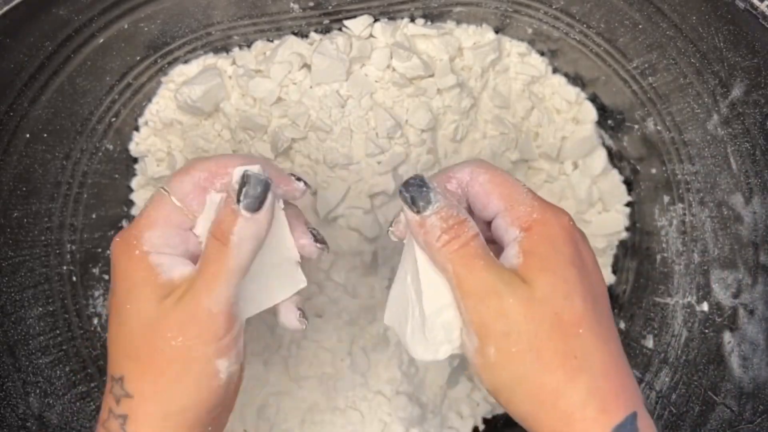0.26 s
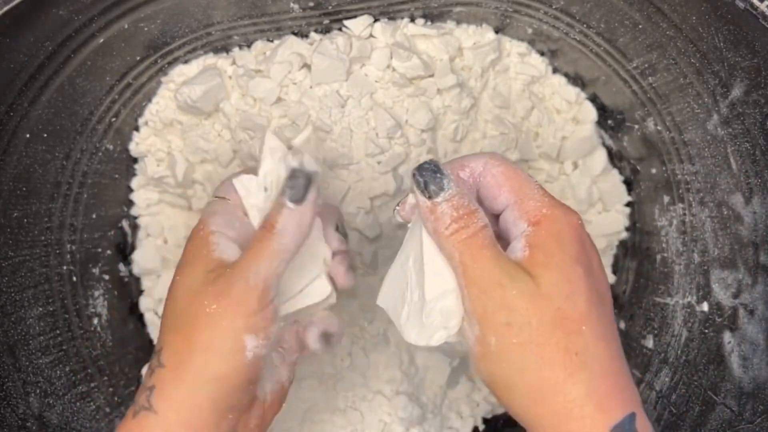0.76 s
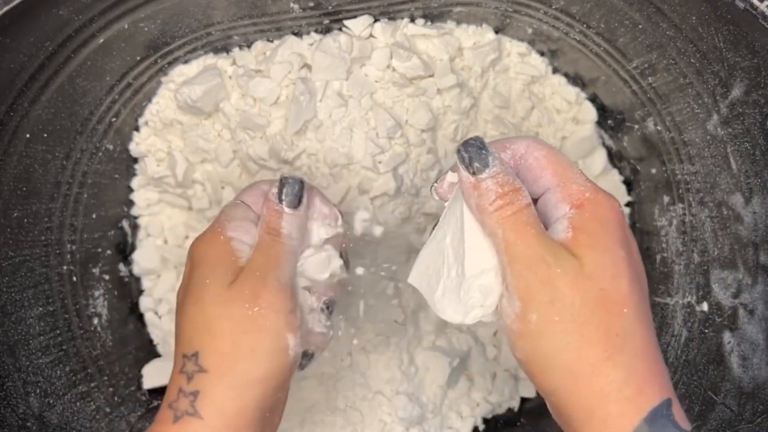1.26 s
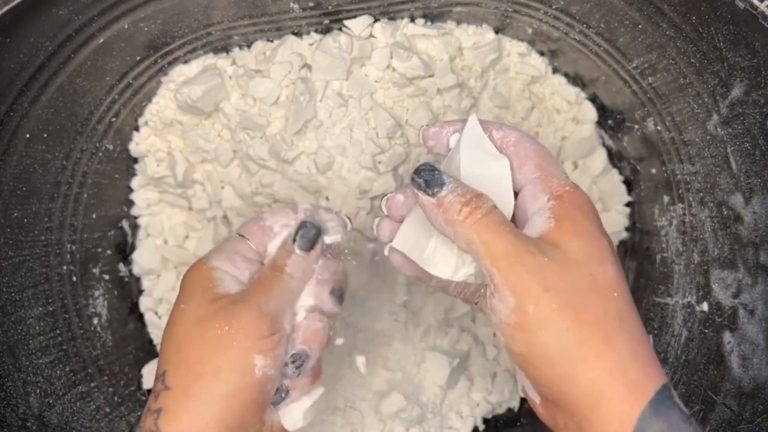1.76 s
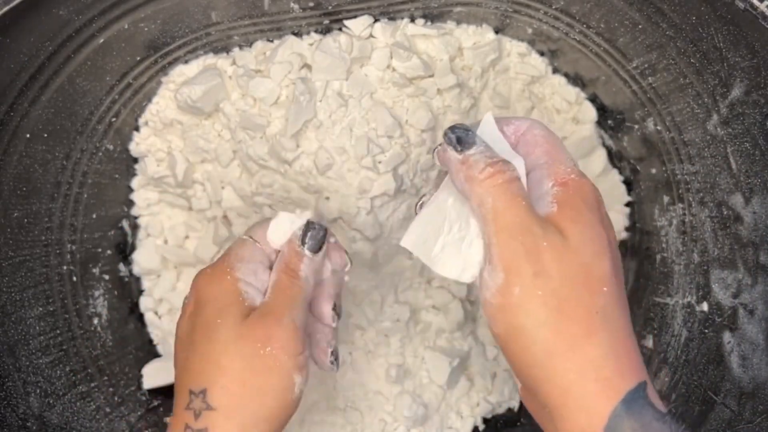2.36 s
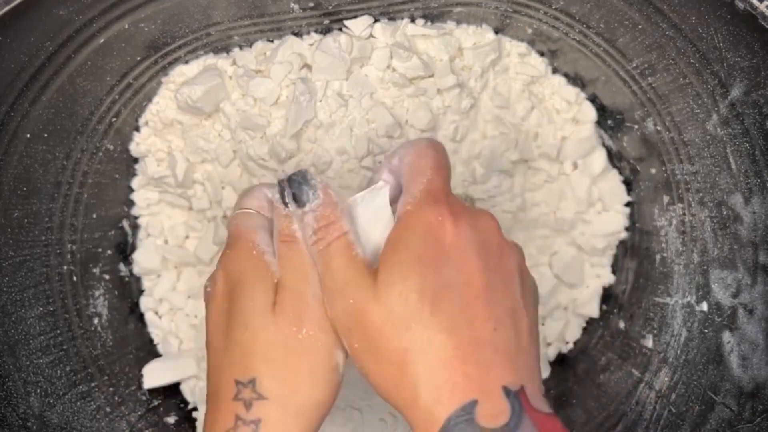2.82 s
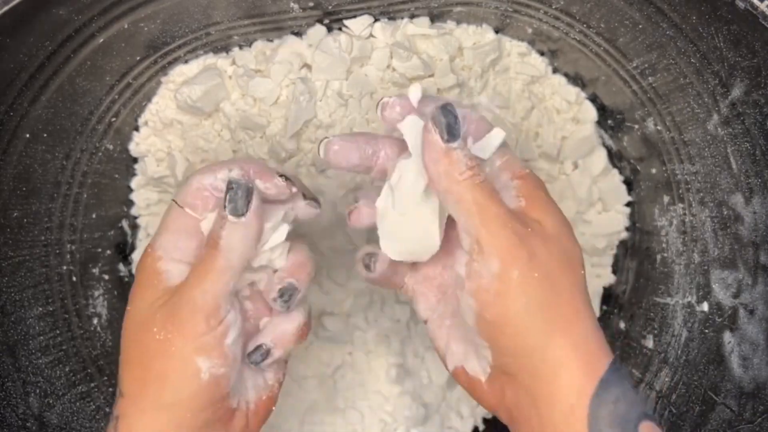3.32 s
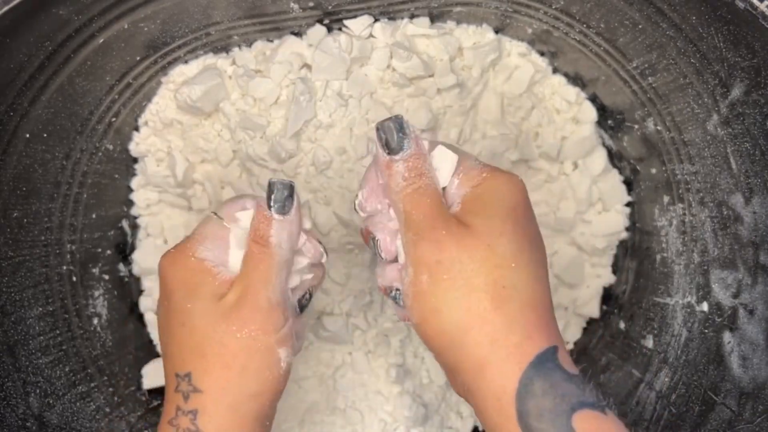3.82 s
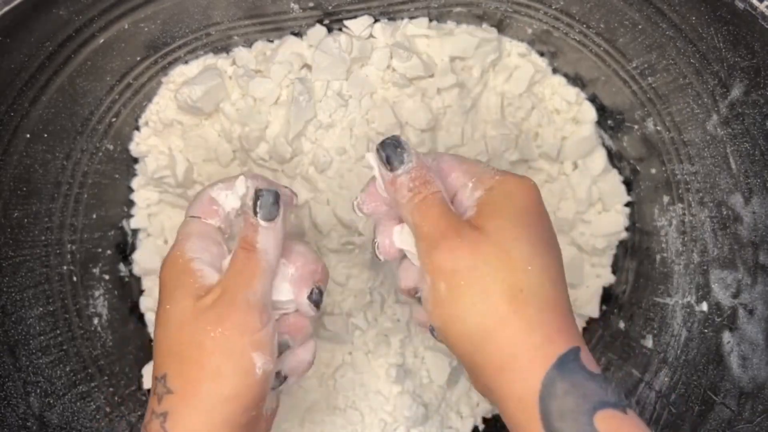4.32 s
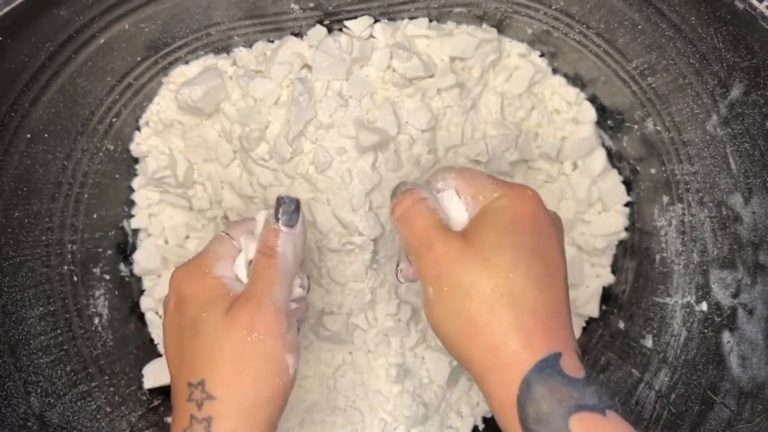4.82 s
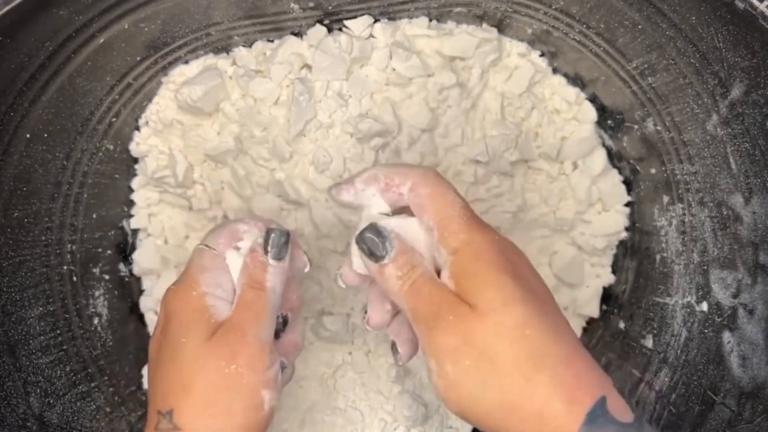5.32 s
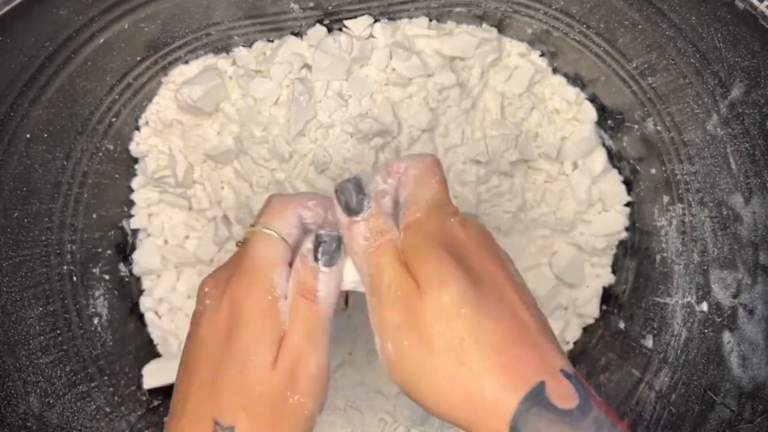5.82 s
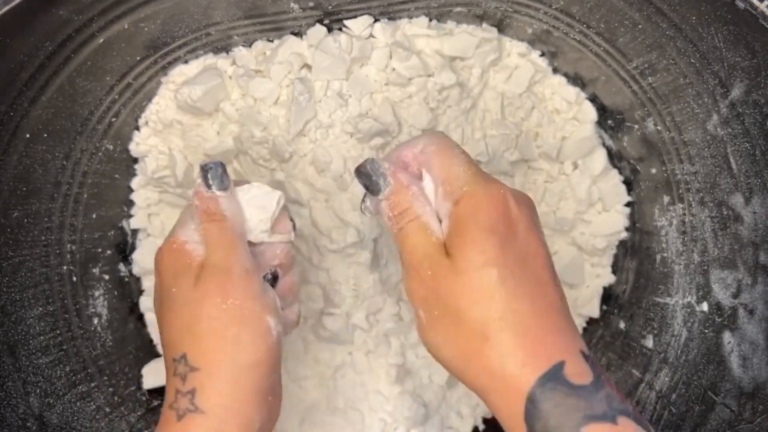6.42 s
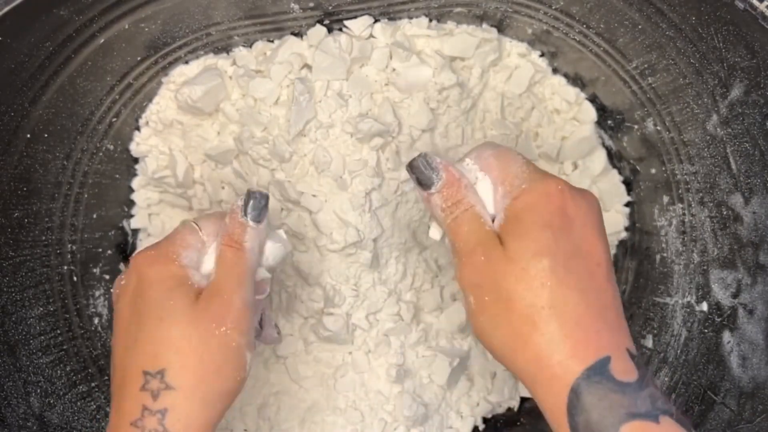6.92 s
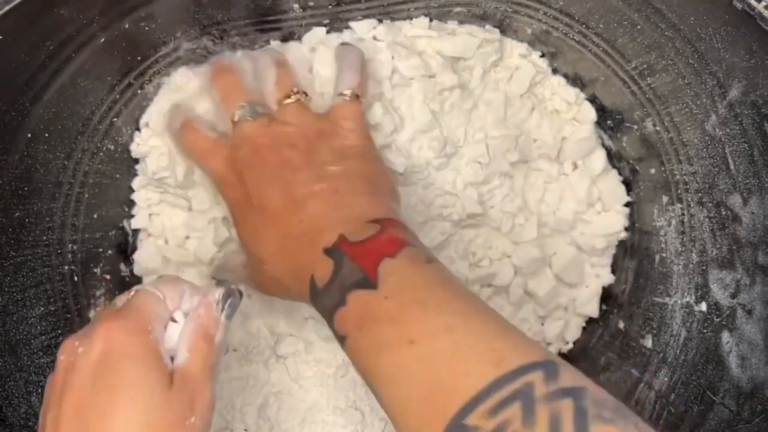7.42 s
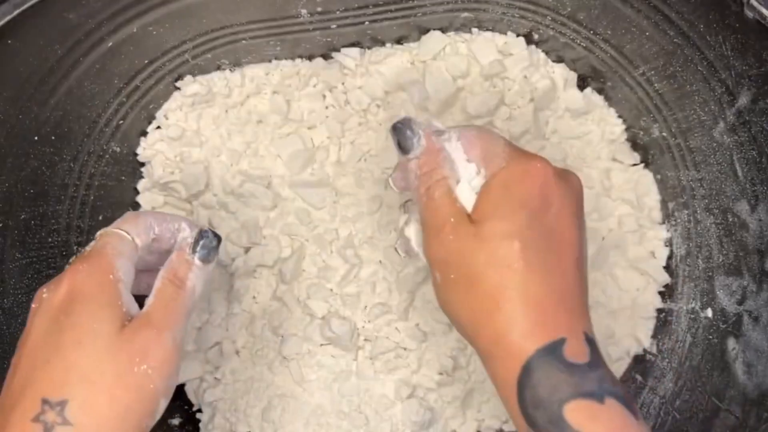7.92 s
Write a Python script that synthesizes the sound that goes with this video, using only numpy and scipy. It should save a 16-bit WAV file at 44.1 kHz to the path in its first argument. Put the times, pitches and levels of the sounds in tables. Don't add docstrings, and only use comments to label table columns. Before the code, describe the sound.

Crisp chalk fractures and powdery crunches right at the microphone, fingers kneading loose grit between them, then a hand rakes the heap and the tub booms.

```python
import sys
import numpy as np
from scipy import signal
from scipy.fft import rfft, irfft, next_fast_len
from scipy.io import wavfile

SR = 44100
rng = np.random.default_rng(int(sys.argv[2]) if len(sys.argv) > 2 else 0)


def int16_out(signal):
    q = np.round(np.clip(np.atleast_2d(signal).T, -1, 1) * 32767)
    wavfile.write(sys.argv[1], SR, q.astype(np.int16))


def amp(db):
    return 10 ** (np.asarray(db, float) / 20)


N = 360297


def rms_one(x):
    return x / np.sqrt(np.mean(x ** 2) + 1e-20)


def peak_one(x):
    return x / (np.max(np.abs(x)) + 1e-12)


def noise():
    return rng.standard_normal(N)


def band(x, low_hz, high_hz):
    sos = signal.butter(2, [low_hz, min(high_hz, .45 * SR)], "band", fs=SR, output="sos")
    return signal.sosfilt(sos, x)


def resonate(x, hz, width_hz):
    r = np.exp(-np.pi * width_hz / SR)
    poles = [1, -2 * r * np.cos(2 * np.pi * hz / SR), r * r]
    return signal.lfilter([(1 - r * r) / 2, 0, (r * r - 1) / 2], poles, x)


def colour(x, spectrum):
    hz, level_db = np.transpose(spectrum)
    size = next_fast_len(N)
    log_hz = np.log(np.fft.rfftfreq(size, 1 / SR) + 1)
    gain = amp(np.interp(log_hz, np.log(hz), level_db))
    return rms_one(irfft(rfft(x, size) * gain, size)[:N])


def drift(rate):
    r = np.exp(-64 * np.pi * rate / SR)
    white = rng.standard_normal(N // 32 + 1002)
    slow = signal.lfilter([1], [1, -2 * r, r * r], white)[1000:]
    return np.interp(np.arange(N) / 32, np.arange(len(slow)), rms_one(slow))


def add(out, s, piece):
    i = round(s * SR)
    out[i:i + len(piece)] += piece[:N - i]


def in_time(rows, outside_db=None):
    s, *columns = np.transpose(rows)
    return [np.interp(np.arange(N) / SR, s, c, outside_db, outside_db) for c in columns]


def grit(per_s, cycles, low_hz, high_hz, hiss, clump_db, crackle):
    sizes = amp(4.3 * np.minimum(rng.exponential(1, N), 4)) * rng.choice([-1, 1], N)
    clumps = clump_db * drift(30)
    grains = rms_one(sizes * (rng.random(N) < per_s * amp(clumps) / SR))
    dealt = rng.integers(0, 8, N)
    dust = hiss * amp(0.77 * clumps) * noise()
    out = crackle * grains * (rng.random(N) < .12)
    for k, hz in enumerate(np.geomspace(low_hz, high_hz, 8)):
        ring = resonate(grains * (dealt == k) + 0.5 * dust, hz, hz / cycles)
        out += amp(.5 * clump_db * drift(4.6)) * ring * (-1) ** k
    return out


# (f/Hz, level/dB per Hz)
ROOM_AIR = [(35, -18.5), (60, 3.5), (133, -3), (244, -8), (458, -23), (842, -21), (1140, -25.5),
            (1700, -33), (2470, -32), (7570, -41.5), (11000, -36), (14900, -47), (16000, -72)]
# (f/Hz, width/Hz, rms level/dB)
ROOM_HUM = [(113.94, 15.5, -48), (166.9, 25, -55.5), (827, 60, -69.5)]


def room():
    out = amp(-49) * colour(noise(), ROOM_AIR)
    for hz, width_hz, level_db in ROOM_HUM:
        tone = resonate(resonate(noise(), hz, width_hz), hz, width_hz)
        out += amp(level_db + 3.2 * drift(12)) * rms_one(tone)
    return out


# (f/Hz, level/dB per Hz)
RUMBLE_SPECTRUM = [(8.8, -41.5), (15, 7), (32, -6), (86, -25.5), (120, -13.5), (160, -22.5), (260, -120)]
# (t/s, level/dB)
RUMBLE_LEVEL = [
    (0, -40.5),
    (2.5, -40),
    (5.0, -39.5),
    (5.7, -35.5),
    (7.35, -34),
    (7.39, -18),
    (7.55, -23.5),
    (7.68, -38),
    (8.05, -33),
    (8.17, -42),
]


def tub_rumble():
    level_db, = in_time(RUMBLE_LEVEL)
    return amp(level_db) * colour(noise(), RUMBLE_SPECTRUM)


# (t/s, peak level/dB, f/Hz, t60/s)
TUB_ROCKS = [
    (2.471, -37, 66, .4),
    (7.385, -16.5, 137, 0.2),
    (7.4, -18, 25, 0.82),
    (7.989, -30, 51, 0.75),
]


def booms():
    out, t = np.zeros(N), np.arange(20000) / SR
    for s, peak_db, hz, t60 in TUB_ROCKS:
        swing = (1 - np.exp(-t * hz * 2)) * np.sin(2 * np.pi * hz * t)
        add(out, s, amp(peak_db - 60 * t / t60) * swing)
    return out


# (t/s, peak level/dB)
WALL_KNOCKS = [(0.577, -27), (0.904, -43), (2.312, -42), (2.522, -35), (2.822, -36.5), (2.926, -22),
               (3.099, -30.5), (3.661, -41), (4.783, -32.5), (5.617, -38), (5.7, -39.5), (6.074, -34.5),
               (6.99, -30), (7.235, -35.5)]


def thumps():
    wall_hz, wall_t60_s = 306, 0.021
    out, t = np.zeros(N), np.arange(3000) / SR
    boom = amp(-60 * t / wall_t60_s) * (1 - np.exp(-t / 0.0005)) * np.sin(2 * np.pi * wall_hz * t)
    for s, peak_db in WALL_KNOCKS:
        add(out, s + 0.0033, amp(peak_db + 8.5) * boom)
    return out


# (t/s, peak level/dB, f/Hz, t60/s)
RING_TOUCHES = [(.03, -46, 7640, 0.047), (.08, -58, 9000, 0.065), (.312, -47, 10360, 0.087),
                (0.337, -42, 10360, 0.07), (.356, -47, 10360, .06), (.374, -51, 10360, 0.034),
                (5.222, -52, 9900, .04), (5.247, -52, 8700, .04), (5.852, -54, 10500, 0.036),
                (.845, -31, 10850, 0.044), (.84, -45, 14700, 0.046), (1.44, -41, 14700, .04),
                (1.447, -50, 9400, 0.11), (3.261, -38, 10700, 0.063), (3.275, -32, 13060, 0.045),
                (3.32, -43, 10221, 0.058), (3.455, -49, 6400, 0.065), (4.1097, -30, 7370, 0.06),
                (4.1193, -18.5, 7360, 0.059), (4.109, -37, 14300, .03), (4.29, -43, 10000, 0.038),
                (4.42, -61, 11050, 0.04), (7.462, -27.5, 11550, 0.035), (7.859, -35.5, 10380, 0.11),
                (7.862, -38, 10800, 0.082)]


def clinks():
    out, t = np.zeros(N), np.arange(6000) / SR
    rattle = rng.standard_normal((len(RING_TOUCHES), 40))
    for (s, peak_db, hz, t60), shake in zip(RING_TOUCHES, rattle):
        tremble_db = 2.5 * np.interp(t / t.max() * 39, np.arange(40), shake)
        fall = amp(peak_db - 2.5 + tremble_db - 60 * (t / t60) ** 1.3)
        add(out, s, fall * (1 - np.exp(-t / 0.00035)) * np.sin(2 * np.pi * hz * t))
    return out


# (f/Hz, level/dB per Hz)
LUMP_SPECTRUM = [(60, -13.5), (110, -1.5), (300, -4), (600, -11), (1200, -40.5)]
# (f/Hz, level/dB per Hz)
CRUNCH_SPECTRUM = [(300, -30.5), (700, -1), (1800, -6), (3000, -13), (6000, -23.5), (12000, -37)]
# (t/s, lumps level/dB, crunch level/dB)
RAKE_STROKE = [
    (7.352, -65, -99),
    (7.356, -34, -35),
    (7.39, -24.5, -36),
    (7.45, -28.5, -35.5),
    (7.52, -26.5, -32.5),
    (7.55, -33, -38.5),
    (7.59, -35, -30),
    (7.64, -50, -34.5),
    (7.7, -50, -51.5),
]


def raked_heap(lumps_db, crunch_db):
    lumps = colour(noise() * amp(2.5 * drift(19)), LUMP_SPECTRUM)
    crunch = grit(1700, 4.1, 500, 5300, hiss=1.1, clump_db=3.6, crackle=.12)
    return amp(lumps_db) * lumps + amp(crunch_db + 2.5) * colour(crunch, CRUNCH_SPECTRUM)


# (t/s of hardest moment, crumbs level/dB, time/s to fade 20 dB, dust level/dB re crumbs)
FINGER_RUBS = [(0.03, -55, -0.26, 5), (0.223, -44, 0.06, 0), (0.255, -53, 0.13, -1.0),
               (0.339, -52, -0.14, 6.5), (0.846, -43, -0.07, 8.5), (0.882, -39, 0.01, 1),
               (0.96, -30.5, 0.0352, -6.0), (1.135, -53, 0.22, -2.5), (1.277, -47, 0.1, 1),
               (1.321, -47.5, 0.27, -18), (1.441, -49, 0.1, -5), (1.602, -58, 0.16, -1.0),
               (1.764, -45.5, 0.15, -1.5), (1.808, -44, 0.08, -4), (1.956, -31, 0.0064, 3),
               (2.319, -44, 0.05, -4), (2.422, -45, 0.06, -6.0), (2.528, -51.5, 0.1, -2.5),
               (2.746, -63.5, 0.17, 5.0), (2.834, -59.0, 0.04, -4), (3.109, -38, -0.01, -15),
               (3.289, -47.5, 0.06, 0.5), (3.562, -47.5, 0.16, -4.5), (3.841, -50, 0.2, -3.0),
               (4.123, -40.5, 0.02, 6), (4.867, -50, 0.07, -3.0), (4.965, -47.5, -0.1, 0),
               (5.164, -41, 0.07, -1), (5.218, -50.5, 0.12, 0.5), (5.41, -54.5, 0.26, -6),
               (5.709, -48, 0.1, -5), (5.843, -50.0, 0.09, -13), (6.08, -51, 0.05, -5.5),
               (6.192, -52, 0.03, 9), (6.352, -53.5, 0.1, -2), (6.469, -51, 0.05, 0),
               (6.579, -45.5, 0.04, -7), (6.629, -48.0, 0.09, 1), (6.767, -49.5, 0.04, 5),
               (6.832, -51, 0, -10), (6.864, -42.5, 0.05, -8), (7.11, -53, 0.07, -14),
               (7.176, -43, 0.05, -4), (7.736, -43.5, 0.07, -3), (7.788, -47.5, 0.17, -2),
               (7.84, -59, 0.2, -5), (7.872, -53, 0, -1), (7.908, -48, 0.041, -5.0),
               (7.936, -43.5, 0.12, -6), (8.044, -51, 0.16, -7.0)]
SLOW_KNEADS = [(.14, -56, 0, 5.5), (.7, -58.5, 0.6, 5), (1.04, -53, 0.3, -3), (1.51, -56.5, 0.34, -4),
               (1.69, -61, 0.7, -1), (2.04, -54.5, 0.4, 0.5), (2.2, -62.5, 0.57, 2), (2.62, -63, 0.2, 2.5),
               (3.2, -54.5, 0.17, 4.5), (3.42, -56, 0.05, 2.5), (3.99, -54.5, 1.1, -2.5),
               (4.2, -50.5, 0.17, -5), (4.4, -66, 2, -2), (5.075, -51.5, 0.2, -1), (5.29, -54.5, .12, -2),
               (5.46, -57, 0.1, -3), (5.61, -54, 0.16, -0.5), (5.92, -63, -0.5, -1.5), (6.32, -63, 0.4, 0),
               (6.41, -46, 0.05, -3.5), (6.7, -56, 0.2, -5), (6.93, -58, 0.5, 0.5),
               (7.27, -47.5, -0.1, 0.5), (7.99, -56, 0.5, -7)]
GRIP_CRUSHES = [
    (.434, -38.5, 0.1, 8),
    (.52, -34, 0.08, -0.5),
    (.6, -43, 0.12, -7.5),
    (2.932, -26, 0.1, -13),
    (3.64, -41.5, 0.15, -5),
    (3.69, -32, 0.21, -11.5),
    (4.57, -36, 0.13, -10),
    (4.7, -38.5, 0.26, -5.5),
    (7.0, -51, 0.4, -22),
]


def hands(rake_db):
    t = np.arange(0, N, 88)[:, None] / SR
    s, peak_db, *_, shower_db = np.transpose(breaks_list())
    shower_t60_s = 0.14
    showers_db = peak_db + shower_db - 60 * np.abs(t - s) / shower_t60_s
    shed = ((t > s) * amp(2 * showers_db)).sum(axis=1)
    s, level_db, fade, dust_db = np.transpose(list(FINGER_RUBS) + list(SLOW_KNEADS) + list(GRIP_CRUSHES))
    counts = [len(FINGER_RUBS) + len(SLOW_KNEADS), len(GRIP_CRUSHES)]
    rise = fade * np.repeat([0.76, .025], counts)
    bend = np.repeat([1.28, 1], counts)
    rub = amp(2 * (level_db - 20 * np.maximum((t - s) / fade, (s - t) / rise) ** bend))
    raked = amp(2 * rake_db[::88])
    crumbs = rub.sum(axis=1) + shed + raked * amp(2 * -4)
    dust = rub @ amp(2 * dust_db) + shed * amp(2 * -12.5) + raked * amp(2 * -7.5)
    resting = amp(2 * -77)
    return [np.interp(np.arange(N) / SR, t[:, 0], 10 * np.log10(power + resting))
            for power in (crumbs, dust)]


# (f/Hz, level/dB per Hz)
CRUMB_SPECTRUM = [(1000, -21), (1700, -12), (2500, -9.5), (4500, -14), (6500, -15.5), (10000, -28)]
# (f/Hz, level/dB per Hz)
DUST_SPECTRUM = [(3500, -17.5), (5500, -3), (8000, 1), (12000, -5.5), (15500, -11.5)]


def loose_chalk(crumbs_db, dust_db):
    crumbs = grit(900, 3.0, 2180, 6000, hiss=1.5, clump_db=3.5, crackle=0.29)
    dust = grit(1500, 6.8, 5000, 16000, hiss=1.3, clump_db=4.0, crackle=.4)
    scuff_db = 0.6 * crumbs_db - 32.5 + 6.0 * np.minimum(drift(36), 1.6)
    scuff = amp(scuff_db) * rms_one(band(noise(), 150, 970))
    crumbs = amp(crumbs_db - 2.5) * colour(crumbs, CRUMB_SPECTRUM)
    return crumbs + amp(dust_db - 2.1) * colour(dust, DUST_SPECTRUM) + scuff


# (t/s, peak level/dB, ring f/Hz)
CRUMB_TICKS = [(0.0689, -37.0, 5000.0), (0.1062, -46.0, 5500.0), (0.117, -32, 5900.0),
               (0.1832, -46, 5600.0), (0.2167, -32, 5700.0), (0.2295, -31, 4500.0), (0.2889, -37.0, 4700.0),
               (0.2946, -32, 6150), (0.4137, -43.0, 4200.0), (0.5777, -16, 4700.0), (0.6334, -32.0, 4100.0),
               (0.8044, -37, 3300.0), (0.8766, -26, 3870), (1.2177, -28, 4930), (1.2591, -30, 3300.0),
               (1.273, -38, 3100.0), (1.315, -34.0, 4100.0), (1.4247, -40, 3200.0), (1.803, -25, 6140),
               (2.1117, -32, 4900.0), (2.189, -38, 5500.0), (2.3397, -30, 3400.0), (2.7397, -42, 5200.0),
               (3.018, -37, 4000.0), (3.1481, -35, 2700.0), (3.4211, -42, 4700.0), (3.5888, -40, 3400.0),
               (3.7882, -25, 4400.0), (3.884, -34, 3900.0), (4.3567, -36, 3300.0), (4.4354, -51, 4600.0),
               (4.6701, -28, 6200.0), (5.1049, -33, 5700.0), (5.118, -28, 4400.0), (5.213, -30, 7200.0),
               (5.2705, -36, 3700.0), (5.5081, -44.0, 3700.0), (5.6024, -36, 5000.0), (5.6338, -32, 4900.0),
               (5.6645, -28, 3080), (5.732, -39, 4400.0), (6.1704, -44.5, 5400.0), (6.2834, -46, 4220),
               (6.528, -31.5, 5170), (6.617, -32, 4200.0), (6.7119, -33, 7200.0), (6.783, -34, 5400.0),
               (6.838, -31.0, 3900.0), (6.9201, -39.0, 5600.0), (7.1582, -41, 5800.0),
               (7.1654, -29.0, 6300.0), (7.2323, -30, 5800.0), (7.256, -33, 4400.0), (7.2923, -34, 4500.0),
               (7.7468, -27, 3900.0), (7.7997, -28, 5300.0), (7.851, -30, 6000.0), (8.019, -29.0, 4100.0),
               (8.0786, -33, 3900.0), (8.0855, -29, 3100.0)]
# (t/s, peak level/dB)
FLYING_SPLINTERS = [(.0266, -41), (.306, -42), (.4662, -24), (.4747, -27), (0.5487, -21), (.5637, -26),
                    (0.76, -39), (.8245, -40), (.943, -30), (1.0122, -29), (1.2039, -33), (1.2898, -38),
                    (1.3252, -36), (1.884, -37), (2.0103, -36), (3.0958, -30), (3.2439, -37),
                    (3.4282, -38.5), (3.6142, -42), (3.675, -24), (3.6806, -25), (3.714, -20),
                    (3.8967, -33), (4.0606, -33), (4.0647, -33), (4.1463, -23), (4.1583, -26),
                    (4.1835, -31), (4.588, -19), (4.7423, -28), (4.774, -26), (4.863, -30), (5.1248, -32),
                    (6.7316, -35), (7.643, -27), (7.6501, -25), (7.6732, -28), (7.833, -28), (7.8778, -33),
                    (8.1002, -37)]
# (t/s, peak level/dB)
FAINT_CHIPS = [(1.6733, -29.5), (1.8124, -24), (2.6572, -39.5), (3.2941, -32.5), (3.396, -29.5),
               (3.967, -40.5), (3.9885, -30.5), (4.1713, -30.5), (4.23, -32), (4.8335, -35),
               (5.0384, -35.5), (5.807, -27.5), (5.875, -36.5), (5.951, -38.5), (6.4765, -23.5),
               (6.691, -27), (6.8248, -27.5), (7.1985, -24), (7.7797, -26), (7.8619, -25), (8.012, -26.5)]
# (t/s, peak level/dB, ring f/Hz)
THIN_FLAKES = [(0.4837, -18, 5200), (0.6753, -27.5, 4840), (1.0284, -26, 4350), (1.2262, -27, 4700),
               (1.331, -28, 4740), (1.603, -28.5, 7400), (1.7938, -24, 6740), (1.8306, -21, 6800),
               (1.936, -20.5, 5270), (2.2062, -30, 3820), (3.2219, -24, 4800), (3.275, -27.5, 5020),
               (3.8704, -23.5, 4700), (4.0792, -25, 8610), (4.4106, -29, 3740), (4.5026, -27, 5150),
               (4.759, -20, 5000), (4.782, -19, 5400), (4.868, -22, 4270), (5.219, -29, 6900),
               (5.403, -23.5, 4660), (5.8308, -27, 4060), (6.1818, -29.5, 4500), (6.632, -24, 5600),
               (6.7362, -19, 4350), (6.798, -26, 4080), (6.8546, -21.5, 5660), (7.0978, -24.5, 5540),
               (7.324, -29, 4150), (7.9291, -19.5, 4200)]
# (t/s, peak level/dB, ring f/Hz, thud level/dB re peak)
COARSE_DROPS = [(0.98, -14.5, 2880, -11), (0.9957, -19.5, 2780, -18), (1.364, -28, 2140, -5),
                (1.4333, -24.5, 2840, -21), (1.4407, -25.5, 2500, -15), (1.5303, -30, 2260, -7.5),
                (1.9774, -27, 2330, -22), (2.3107, -26.5, 3880, -10.5), (2.3226, -26, 2680, -4.5),
                (2.423, -31, 2310, -29), (2.5242, -38.5, 1220, 4.5), (2.8253, -33, 2300, -21.5),
                (3.0913, -31, 3800, -29), (3.1009, -28.5, 1570, -34), (3.1125, -22.5, 2850, -33),
                (3.285, -24, 2030, -5.5), (3.804, -24.5, 2460, -19), (4.0961, -24.5, 1840, -3),
                (4.9377, -33, 2170, -21), (6.55, -26.5, 2640, -14.5), (6.5723, -16.5, 2340, -15),
                (6.6524, -21.5, 2200, -7), (6.7612, -26.5, 2330, -20), (7.0094, -23.5, 3730, -2),
                (7.1132, -28.5, 3920, -3), (7.6602, -20, 2070, -17), (7.8376, -21, 3020, -5.5),
                (7.9038, -15, 2600, -4), (7.9521, -23.5, 2540, -8), (8.0387, -20.5, 2750, -20)]
# (t/s, peak level/dB, ring f/Hz, thud level/dB re peak)
BRITTLE_SHATTERS = [(.2518, -13.5, 6300, -25), (.4322, -13, 6340, -17.5), (.4395, -12.5, 6040, -19),
                    (.4584, -13, 4280, -16), (.4986, -9.5, 4900, -29), (.8826, -20, 2930, -16),
                    (.9047, 2, 2200, -8), (.9524, -7, 3700, -9.5), (1.949, -7, 3225, -14.5),
                    (1.9584, -15, 6960, -23), (2.9452, -4, 2410, -25), (3.6894, 5, 3000, -10.5),
                    (3.7612, -16, 5600, -8.5), (3.8326, -12.5, 2480, -15), (3.8538, -20.5, 2510, -15),
                    (4.6505, -19, 3920, -27), (4.6861, -16, 4300, -27), (4.6966, -10, 4070, -7),
                    (4.72, -19, 3850, -1), (4.7302, -8, 3340, -43), (5.144, -33.5, 7580, -1.5),
                    (5.1602, -14, 5000, -11), (6.4527, -10.5, 2410, -6.5), (6.7694, -18, 2200, -6),
                    (7.1765, -14, 5040, -17), (7.5568, -18.5, 1630, 9.5), (7.7253, -22.5, 3000, -11),
                    (7.962, -27.5, 9100, -7)]
# (t/s, peak level/dB, ring f/Hz, thud level/dB re peak)
CLEAN_SNAPS = [(.5088, 5, 2110, -39), (.5702, -23, 2220, -23.5), (.5816, 8, 2270, -26),
               (.9173, -11, 2880, -36), (1.8745, -22, 6070, -10), (2.9296, -12, 2470, -1),
               (2.9417, -4.5, 4530, -6.5), (2.9571, 3, 2520, -13.5), (3.5137, -15, 4000, -9.5),
               (3.6249, -8.5, 890, -40), (3.6644, 1, 2410, -11), (3.7482, -15.5, 4540, -24),
               (4.2583, -2.5, 2300, -14), (4.5308, 1, 3260, -10.5), (4.5634, -11, 5300, -16),
               (4.6047, -14, 5700, -19), (5.1635, -14, 2250, -9), (5.842, -16.5, 2630, -7.5),
               (6.0761, -12, 5000, -12.5), (6.3452, -17, 6950, -13.5), (6.867, -21, 5740, -22),
               (6.9908, -8.5, 2030, -4), (6.9951, -10.5, 1420, -5.5), (7.172, -11, 6500, -6),
               (7.3566, -31, 1720, 10), (7.5706, -18, 1810, 0), (7.5865, -10.5, 1660, 4),
               (7.6051, -11.5, 1810, -13), (7.6325, -14, 1700, 5.5), (7.936, -19.5, 5740, -8.5)]


def breaks_list():
    flakes = [(*flake, -14) for flake in THIN_FLAKES]
    flakes += [(*chip, 4300, -5) for chip in FAINT_CHIPS]
    ticks = [(*tick, -18) for tick in CRUMB_TICKS]
    ticks += [(*splinter, 5000, -18) for splinter in FLYING_SPLINTERS]
    kinds = [
        (CLEAN_SNAPS, (-23.5, 0.018, -46)),
        (BRITTLE_SHATTERS, (-2.5, 0.019, -33)),
        (COARSE_DROPS, (-6, .023, -33)),
        (flakes, (-9.5, 0.019, -24.5)),
        (ticks, (-8, .011, -40))]
    return [(*row, *kind) for rows, kind in kinds for row in rows]


def cracks():
    echo_db, echo_t60_s = -6.5, 0.083
    out, t = np.zeros(N), np.arange(2560) / SR
    echo = amp(echo_db - 60 * t / echo_t60_s) * (1 - np.exp(-t / 0.021))
    echo *= 1 - (t / t.max()) ** 2
    events = breaks_list()
    chance = rng.standard_normal((len(events), 2, len(t)))
    for (s, peak_db, hz, thud_db, fizz_db, t60, _), (white, uneven) in zip(events, chance):
        t60 = np.clip(t60, .004, .08)
        snap = peak_one(np.diff(np.exp(-((t - .0006) * hz / 0.23) ** 2), prepend=0))
        snap *= (0.015 / t60) ** 0.92 * min(hz / 2600, 1) ** 2
        breaks = white * amp(6 * uneven) * (t > .0006)
        fall = amp(-60 * t / t60)
        burst = breaks * fall + 0.83 * white * echo + 2.96 * snap
        body = resonate(burst, hz, 280) + 0.35 * resonate(burst, hz, 1.19 * hz)
        body += .35 * band(burst, 1000, 6500)
        thud = band(burst + 1.5 * np.abs(snap), 250, 1850)
        fizz = band(breaks * fall ** 2.8 + .4 * white * echo + 10.0 * snap, 4200, 12500)
        piece = peak_one(body) + amp(thud_db - 1.6) * peak_one(thud)
        piece += amp(fizz_db - 2.0) * peak_one(fizz)
        add(out, s, amp(peak_db + 1.5) * piece)
    return out


def scene():
    lumps_db, crunch_db = in_time(RAKE_STROKE, -120)
    crumbs_db, dust_db = hands(crunch_db)
    mix = room() + tub_rumble() + booms() + thumps() + clinks()
    mix += raked_heap(lumps_db, crunch_db)
    mix += loose_chalk(crumbs_db, dust_db)
    mix += cracks()
    return mix[None]


def low_pass(x):
    return signal.sosfilt(signal.butter(12, 16620, fs=SR, output="sos"), x)


def record(dry):
    overloaded = np.clip(dry, -.95, .95)
    top_cut = signal.ellip(8, .5, 40, 15500, fs=SR, output="sos")
    mix = signal.sosfilt(top_cut, overloaded)
    return low_pass(mix)


dry = scene()
out = record(dry)
int16_out(out)
```